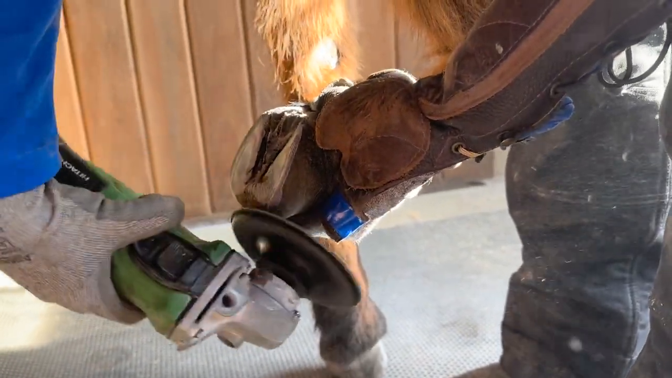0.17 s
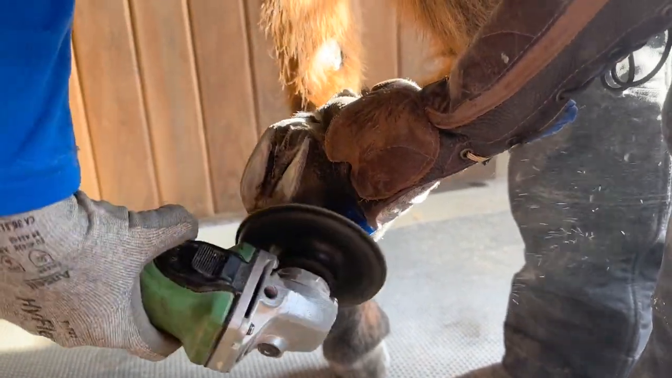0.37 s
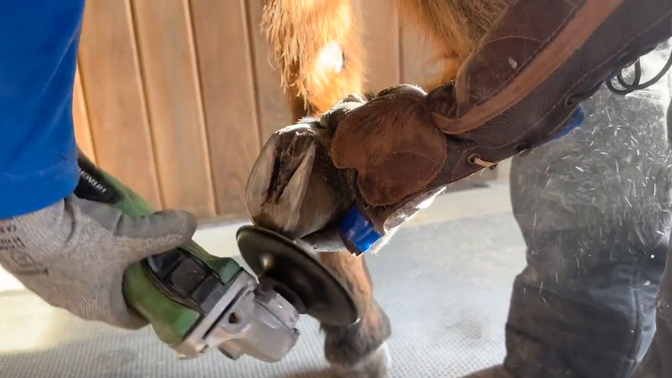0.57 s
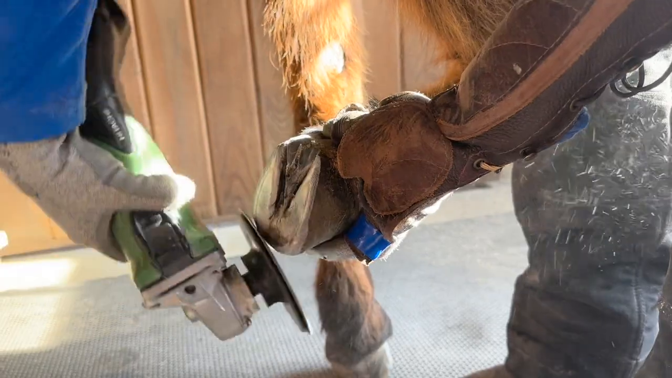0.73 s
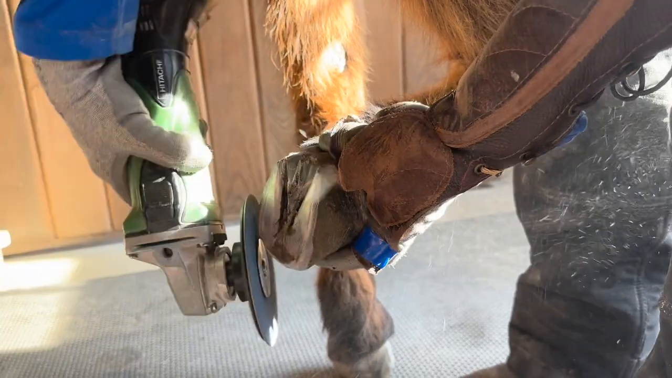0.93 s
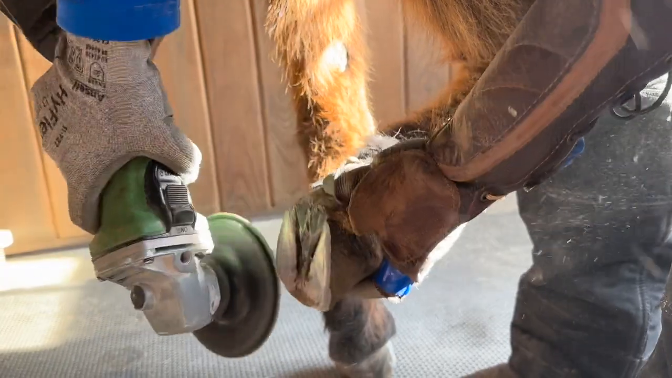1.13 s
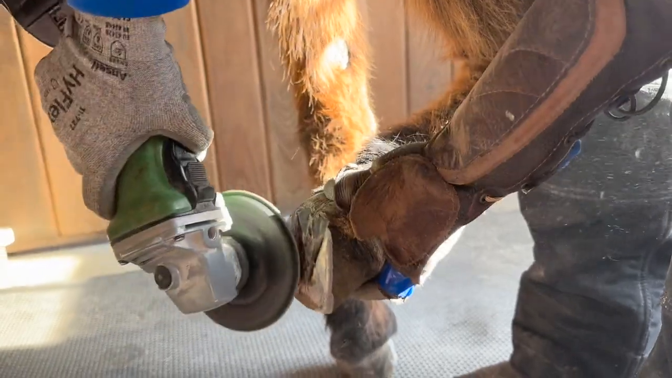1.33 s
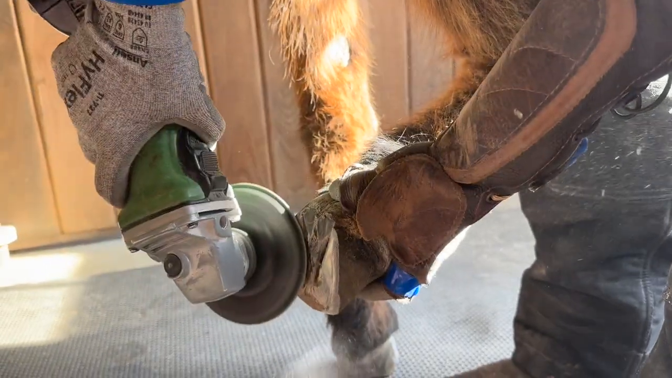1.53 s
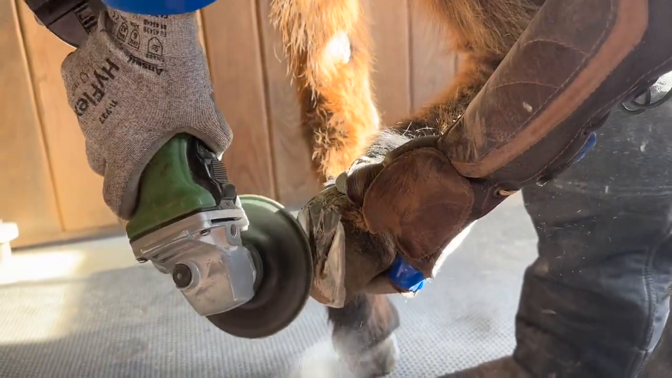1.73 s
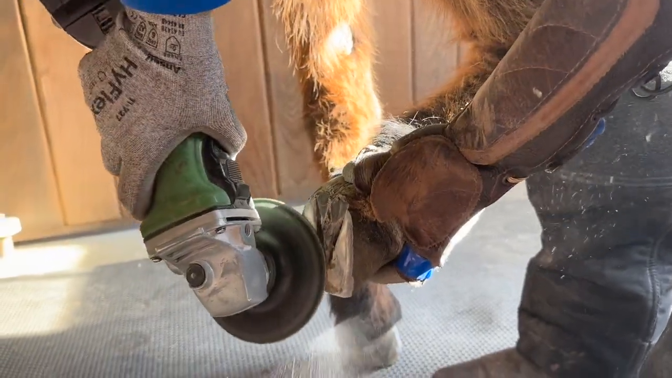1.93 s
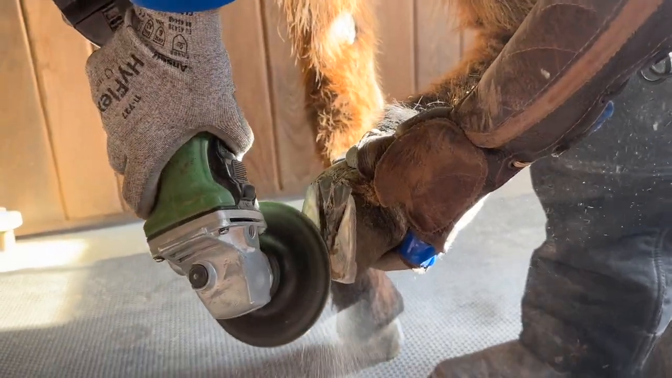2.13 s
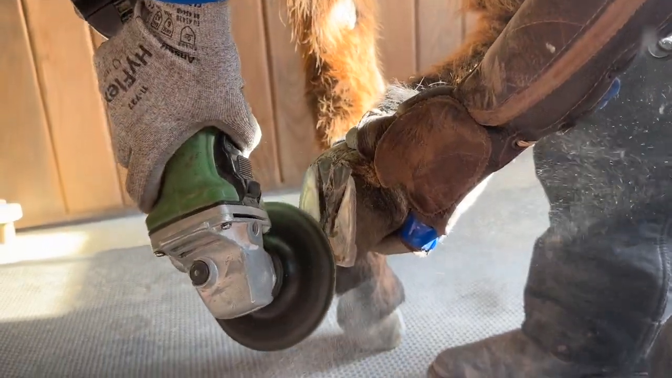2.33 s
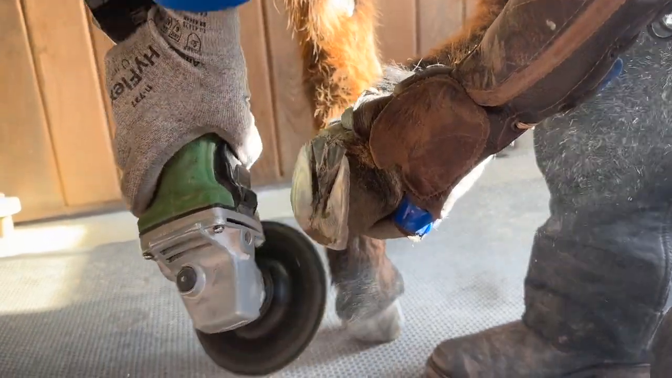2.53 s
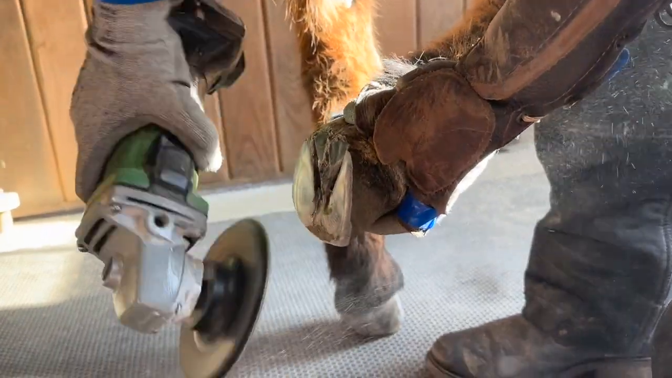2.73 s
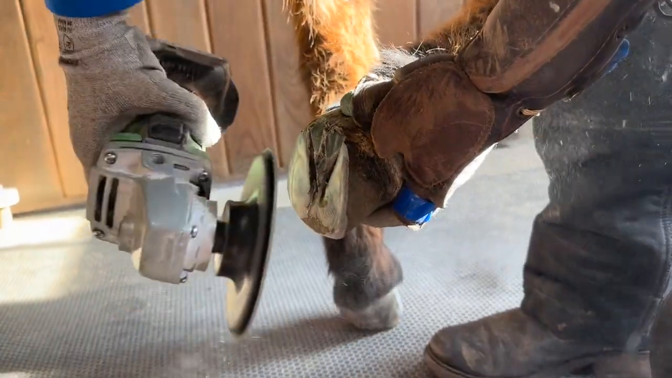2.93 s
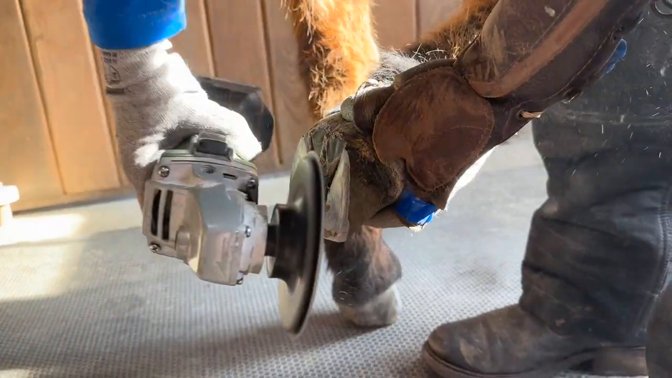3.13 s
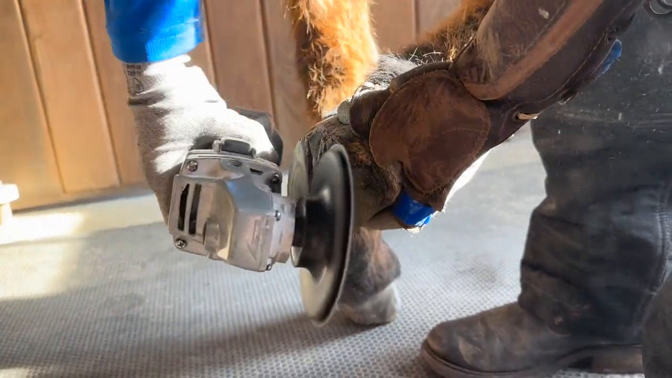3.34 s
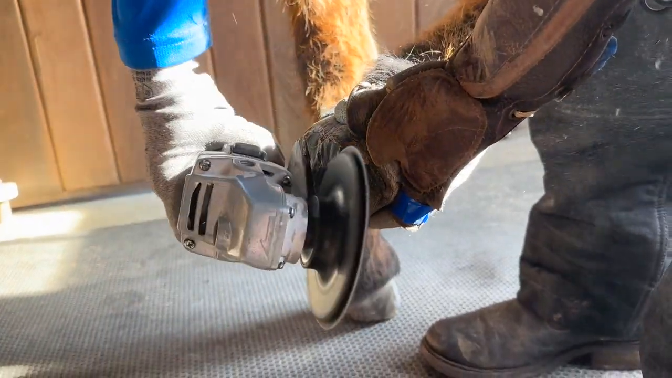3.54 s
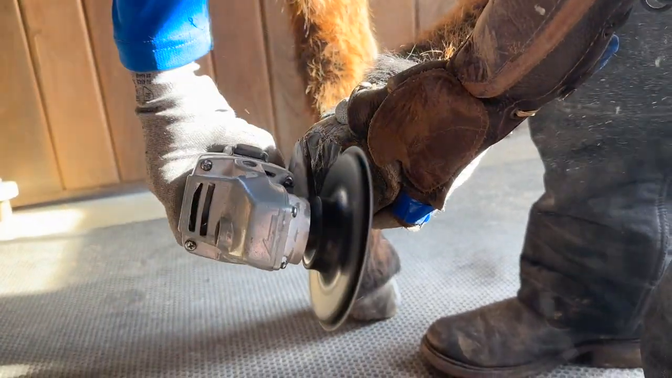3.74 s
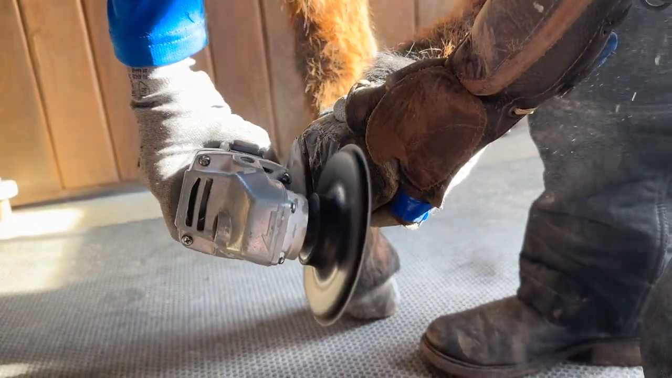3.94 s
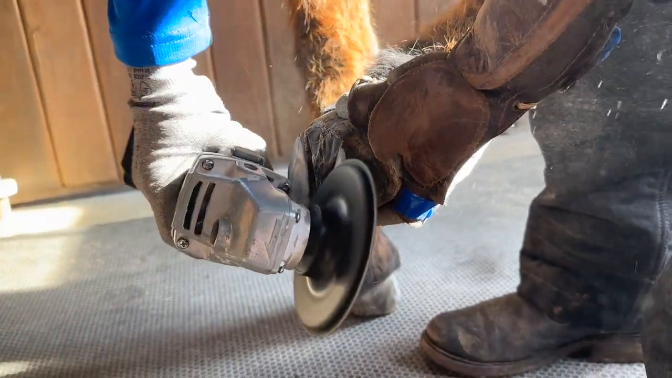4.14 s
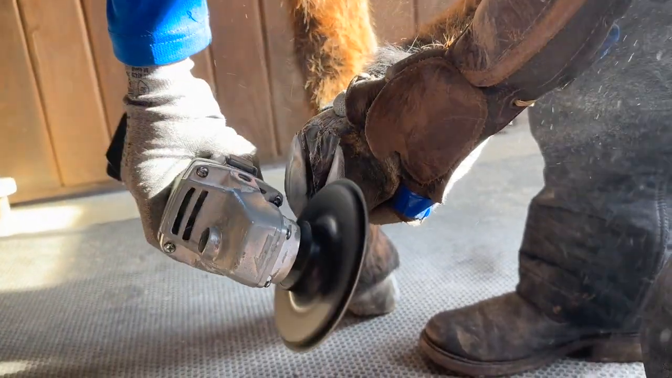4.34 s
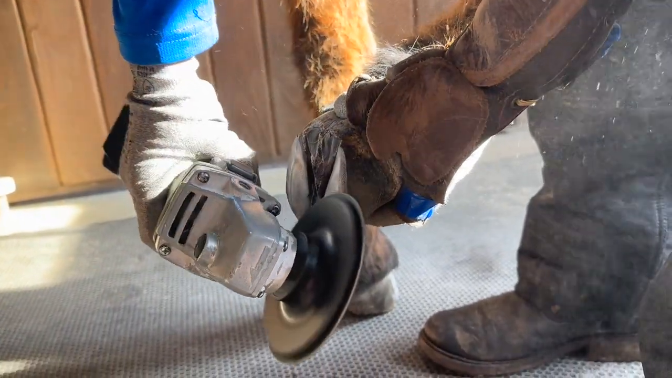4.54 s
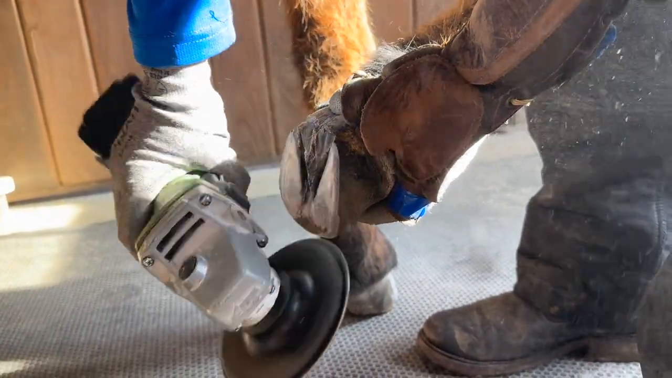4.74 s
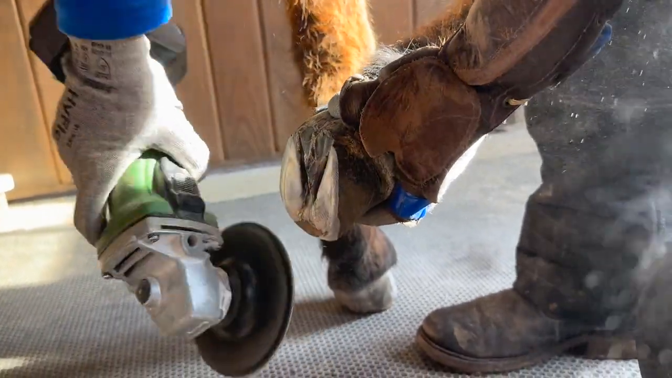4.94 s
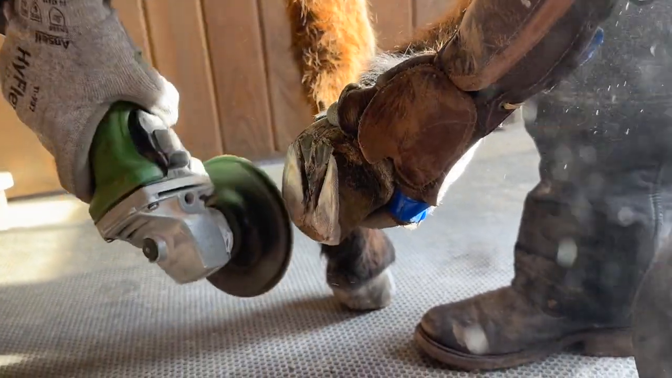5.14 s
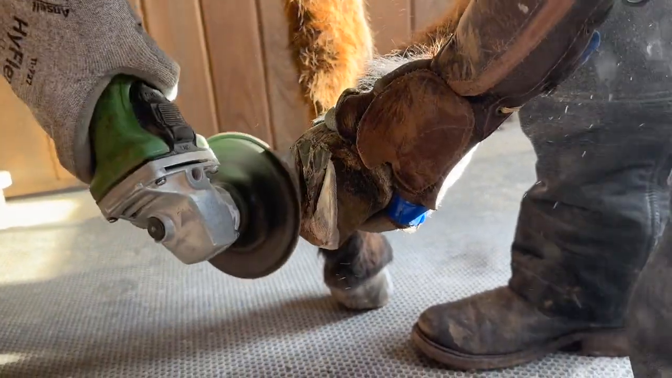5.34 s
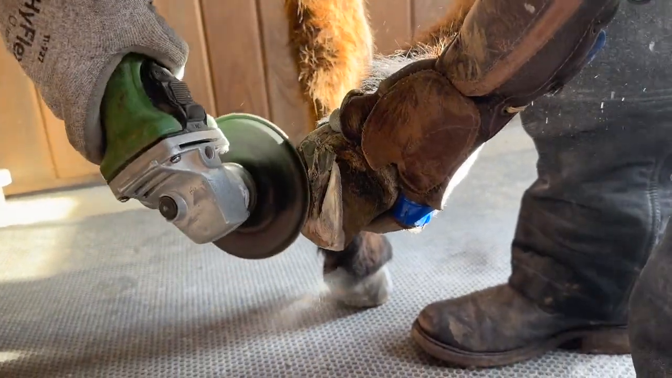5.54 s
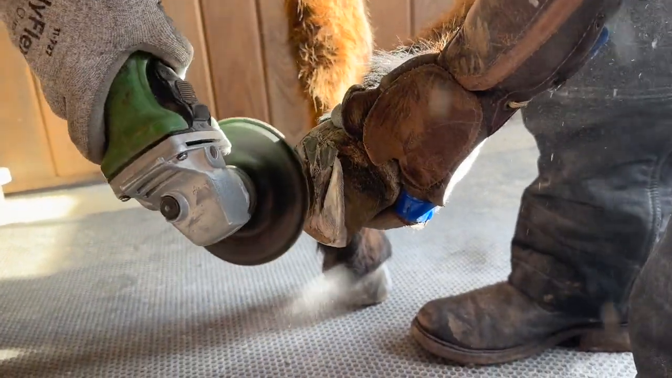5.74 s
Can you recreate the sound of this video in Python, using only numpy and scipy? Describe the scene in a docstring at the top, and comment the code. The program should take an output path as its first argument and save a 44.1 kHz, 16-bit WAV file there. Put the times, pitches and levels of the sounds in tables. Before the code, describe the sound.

An angle grinder rasps a hoof in four passes, buzzing and hissing with squeals, its motor sagging then revving up with gear rattle between.

```python
"""An angle grinder trims a hoof in four passes, heard close up on two microphone ports with no echo.
The grit of the disc scrapes the horn in nearly the same pattern at every turn: a buzzing rasp that sinks
as the motor is loaded, with squeals, slaps and grazes made from sines, chirps and noise.
Between passes the disc spins up, the fan rushes harder and the slack bevel gears rattle;
hum follows the turning rate, fan and gears are shaped noise."""
import sys
import numpy as np
from scipy import signal
from scipy.fft import rfft, irfft, next_fast_len
from scipy.io import wavfile
from scipy.ndimage import uniform_filter1d, map_coordinates

SR = 44100
rng = np.random.default_rng(int(sys.argv[2]) if len(sys.argv) > 2 else 0)


def bounce(signal):
    """Save signal as a 16-bit WAV file at the path given by the first command-line argument."""
    frames = np.transpose(np.atleast_2d(signal))
    limited = np.clip(frames, -1, 1)
    pcm = np.round(limited * 32767).astype(np.int16)
    wavfile.write(sys.argv[1], SR, pcm)


N = 259749

# The motor sags under load and recovers between passes.
# Each row: time in seconds, disc speed in turns per second (a slight wobble is added).
DISC_SPEED = [(0.0, 141.3), (0.11, 140.4), (0.35, 141.8), (0.5, 146.1), (0.59, 146.0), (0.74, 143.4),
              (0.84, 145.5), (0.92, 144.6), (1.02, 146.0), (1.25, 153.4), (1.43, 156.3), (1.56, 150.9),
              (1.68, 143.8), (1.88, 137.2), (2.0, 132.7), (2.3, 130.6), (2.5, 128.0), (2.66, 141.5),
              (2.95, 151.0), (3.42, 155.6), (3.6, 153.5), (3.7, 150.8), (3.79, 152.5), (3.95, 148.6),
              (4.25, 134.6), (4.48, 132.1), (4.69, 132.6), (4.95, 149.0), (5.41, 154.6), (5.54, 150.9),
              (5.62, 148.0), (5.7, 143.6), (5.78, 138.4), (5.87, 134.8)]
FREE_SPEED = 157.8  # turns per second with no load
# Buzz of the hoof. Each row: frequency in Hz, relative density in dB.
HOOF_SPECTRUM = [(200, -20), (400, -8.5), (530, 4), (700, -1), (900, 2), (1200, 5.5), (1450, -1.5),
                 (1750, -2.5)]
# Hiss of the grit. Each row: frequency in Hz, relative density in dB.
HISS_SPECTRUM = [(2500, -1), (3600, -0.5), (4100, -7), (4800, -2.5), (5400, -1.5), (6200, -4.5),
                 (7200, 1.5), (8200, 1), (9500, -0.5), (10500, 2.5), (11500, 2.5), (13000, 1),
                 (15700, -4.5)]
# The disc's ring moves with the contact point, one list for each pass.
# Each row: time in seconds, centre frequency in Hz.
RING_CENTRES = [
    [(0.0, 3150), (0.3, 3050), (0.42, 2770), (0.55, 3100), (0.68, 3240), (0.745, 2600), (0.93, 2670)],
    [(1.4, 2860), (1.68, 2720), (1.79, 2900), (2.0, 2700), (2.3, 2750), (2.51, 2950)],
    [(3.44, 2720), (4.0, 2630), (4.22, 2700), (4.556, 2830), (4.7, 3160)],
    [(5.43, 2900), (5.68, 2900), (5.87, 2730)],
]


def amp(db):
    """Decibels to a linear gain."""
    return 10 ** (np.asarray(db) / 20)


def unit(x):
    """x scaled to rms 1."""
    return x / np.sqrt(np.mean(x ** 2) + 1e-20)


def along(points, hz):
    """Values between points (Hz, value), straight lines on a log frequency axis."""
    f, v = np.transpose(points)
    return np.interp(np.log(hz + 1), np.log(f + 1), v)


def curves(rows):
    """One value per sample for each column after the time."""
    s, *columns = np.transpose(rows)
    return [np.interp(np.arange(N) / SR, s, column) for column in columns]


def wobble(rate, size=N):
    """A smooth random curve with rate knots per second."""
    knots = rng.standard_normal(int(size * rate / SR) + 4)
    return map_coordinates(knots, [np.arange(size) * rate / SR])


def swell(s, length):
    """A smooth bump of height 1 around time s, down to 1/e at length seconds either side."""
    return np.exp(-((np.arange(N) / SR - s) / length) ** 2)


def swells(rows):
    """The summed gain of swells (s, dB, length s)."""
    return sum(amp(db) * swell(s, length) for s, db, length in rows)


def filtered(x, response):
    """x times a complex response of frequency."""
    m = next_fast_len(N + 8192)
    return irfft(rfft(x, m) * response(np.fft.rfftfreq(m, 1 / SR)), m)[..., :N]


def coloured(x, spectrum):
    """x through a spectrum that falls away steeply past its ends, at rms 1."""
    lo, hi = spectrum[0][0], spectrum[-1][0]

    def response(hz):
        low_edge = np.minimum(hz / lo, 1) ** 2
        high_edge = np.maximum(hz / hi, 1) ** 2
        return amp(along(spectrum, hz)) * low_edge / high_edge

    return unit(filtered(x, response))


def noise():
    """Two unrelated white noises."""
    return rng.standard_normal((2, N))


def tone(turns, order):
    """A sine of rms 1 at a multiple of the turning rate."""
    return np.sqrt(2) * np.sin(2 * np.pi * order * turns)


def resonance(x, centre, width_hz, size=1024):
    """x through a steep resonance that follows the rows (s, Hz), at rms 1."""
    hz, t, z = signal.stft(x, SR, nperseg=size)
    centre_hz = np.interp(t, *np.vstack(centre).T)
    detune = (hz[:, None] - centre_hz) / width_hz
    return unit(signal.istft(z / (1 + detune ** 2), SR, nperseg=size)[1][:, :N])


def patchy(x, depth_db, size=512, order=4, count=22):
    """x under random patches of gain, a few hundred Hz wide and about a tenth of a second long."""
    z = signal.stft(x, nperseg=size)[2]
    across_hz = uniform_filter1d(rng.standard_normal(z.shape[1:]), order, 0)
    field = uniform_filter1d(across_hz, count, 1)
    return signal.istft(z * amp(depth_db * unit(field)), nperseg=size)[1][:, :N]


def contact(speed, turns):
    """Gains of buzz, rasp, ring and hiss: strokes set in, grow with load and skip away at lift-off."""
    # The disc on the hoof. Each row: start in seconds, end in seconds, lift-off decay in seconds,
    # then light-load levels in dB of buzz, rasp, ring and hiss, before the hand, tremor and layer trims.
    stroke_rows = [(-.1, 0.905, 0.036, -45.5, -65, -31, -28.5),
                   (1.454, 2.498, 0.033, -35, -41.5, -34, -29.5),
                   (3.426, 3.466, 0.043, -36.5, -30.5, -47, -25.5),
                   (3.521, 3.706, 0.034, -36, -41.5, -33.5, -27.5),
                   (3.728, 3.86, 0.044, -49, -44.5, -41, -40.5),
                   (3.878, 4.683, 0.046, -36.5, -40.5, -34, -29.5),
                   (5.429, 5.864, 0.023, -33, -40, -32.5, -29.5)]
    # Setting in; buzz and rasp need the whole face of the disc.
    # The row: ramp in seconds of buzz, rasp, ring, hiss.
    bed_in = [0.08, 0.15, 0.03, 0.024]
    # Growth with load. The row: dB per turn per second lost, for buzz, rasp, ring, hiss.
    load_gain = [0.028, 0.32, 0.15, 0.22]
    # The hand leans in or eases off. Each row: centre in seconds, change in dB before each layer's
    # share is taken, 1/e half-length in seconds.
    lean_rows = [(0.014, -0.5, 0.04), (0.394, -8, 0.07), (0.753, -6, 0.05), (1.816, 2.5, 0.027),
                 (2.517, 7, 0.031), (3.837, 12, 0.021), (3.928, -10.5, 0.034), (4.67, 6, 0.057),
                 (5.821, 3, 0.029)]
    t = np.arange(N) / SR
    # while it lifts off, the disc skips: the level pulses once a turn
    skip_db = 2.5 * (np.cos(2 * np.pi * turns) - .5)
    strokes = 0
    for start, end, release, *levels in stroke_rows:
        lift = np.maximum(t - end, 0) / release
        lift_off = np.exp(-lift) * amp(np.minimum(lift, 1) * skip_db)
        set_in = np.clip((t - start) / np.vstack(bed_in), 0, 1)
        strokes = strokes + amp(levels)[:, None] * set_in * lift_off
    load_db = np.outer(load_gain, FREE_SPEED - speed)
    hand_db = sum(db * swell(s, length) for s, db, length in lean_rows)
    follows_hand = [0.91, 0.077, 0.29, 0.84]  # share taken by buzz, rasp, ring, hiss
    # the contact is never quite steady
    tremor_db = 1.17 * np.array([wobble(21.983) for _ in follows_hand])
    return strokes * amp(load_db + np.outer(follows_hand, hand_db) + tremor_db)


def grit(turns, wear, uneven_db, rough, size=2048, count=128, order=76):
    """Two scrape patterns repeat each turn and wear into new ones; rough is the share never repeating."""
    shape = (2, count, order)
    first_phase = rng.uniform(0, 2 * np.pi, (2, 1, order))
    drift = first_phase + np.cumsum(rng.normal(0, 0.478, shape), axis=1)
    rims = irfft(amp(uneven_db * rng.standard_normal(shape)) * np.exp(1j * drift), size)
    # read across the worn patterns (wear per second) and round the rim
    where = [np.arange(N) / SR * wear, turns % 1 * size]
    scrapes = [map_coordinates(rim, where, order=1, mode="grid-wrap") for rim in rims]
    repeating = unit(np.array(scrapes))
    share = np.clip(rough, 0, 1)
    return np.sqrt(1 - share) * repeating + np.sqrt(share) * noise()


def loaded(light_hz, rise_hz):
    """Rows (s, Hz) of a resonance that stiffens as the disc is pressed on."""
    return [(s, light_hz + rise_hz * (FREE_SPEED - speed)) for s, speed in DISC_SPEED]


def grinding(turns, gains):
    """The grit shakes hoof and disc; the high side of the disc bites harder once a turn."""
    # Rasp of the horn. Each row: frequency in Hz, relative density in dB.
    horn_spectrum = [(1200, -12), (1500, -0.5), (1850, 2.5), (2050, 9.5), (2250, -4.5), (2600, -0.5)]
    # Broad ring of the disc. Each row: frequency in Hz, relative density in dB.
    disc_spectrum = [(2050, -27), (2250, -36), (2420, 1.5), (2700, 6), (3200, -1), (3600, -6), (4200, 5)]
    # The hoof wall growls when the disc lies flat on it.
    # Each row: centre in seconds, level in dB, 1/e half-length in seconds.
    growl_rows = [(1.83, -33, 0.08), (2.2, -31.5, 0.24), (5.61, -39, 0.038)]
    # The brightest part of the hiss moves with the tilt of the disc.
    # Each row: time in seconds, centre frequency in Hz.
    sizzle_centres = [(0.0, 8700), (0.9, 8800), (1.6, 8850), (2.5, 8950), (3.45, 8500), (4.2, 7440),
                      (4.7, 7860), (5.87, 8000)]
    buzz, rasp, ring, hiss = gains
    bite = np.cos(2 * np.pi * turns) + 0.3 * np.cos(2 * 2 * np.pi * turns + wobble(1.76))

    push = patchy(grit(turns, wear=11, uneven_db=2.5, rough=0.15), depth_db=1.0)
    crumble = grit(turns, wear=11, uneven_db=2, rough=.2)
    # the wall resonates at 900 Hz under no load, 20.7 Hz higher per turn per second lost
    wall = resonance(crumble, loaded(900, 20.7), width_hz=356)
    wall_gain = amp(-14.5) * buzz + swells(growl_rows)
    hoof = amp(-2.5) * buzz * coloured(push, HOOF_SPECTRUM) + wall_gain * wall

    scrape = grit(turns, wear=11, uneven_db=2.5, rough=.11)
    horn = amp(1.0) * rasp * coloured(scrape, horn_spectrum)

    # the disc's broad resonance favours now one, now another order of the turning rate
    rim = grit(turns, wear=21, uneven_db=2.5, rough=.19)
    shake = coloured(rim * amp(0.5 * bite), disc_spectrum)
    skirt = patchy(resonance(shake, RING_CENTRES, width_hz=680), depth_db=1.6)
    disc = amp(-1.5) * ring * skirt

    # the wandering contact point favours now some, now others of the disc's high modes
    flutter = unit(amp(1.43 * bite + 1.14 * wobble(400) + 0.64 * wobble(35)))
    grains = flutter * patchy(grit(turns, wear=21, uneven_db=3.5, rough=0.52), depth_db=2.1)
    broad = amp(1.0) * coloured(grains, HISS_SPECTRUM)
    sizzle = amp(-13.5) * resonance(grains, sizzle_centres, width_hz=1000)
    return hoof + horn + disc + hiss * (broad + sizzle)


def motor(speed, turns):
    """Unbalance hums at the turning rate, the housing drones above it, the fan rushes through the vents."""
    # Unbalance of the disc. Each row: time in seconds, level in dB about which the hum wavers.
    hum_rows = [(0.0, -68), (0.97, -76), (1.05, -55.5), (1.85, -54.5), (1.95, -72), (2.77, -53.5),
                (4.02, -54.5), (4.28, -67), (4.62, -62), (4.67, -52), (4.72, -61), (5.02, -50), (5.33, -56),
                (5.63, -52.5), (5.89, -61)]
    # The housing at three times the turning rate.
    # Each row: time in seconds, level in dB about which the drone wavers.
    drone_rows = [(1.2, -61), (1.48, -47), (1.8, -55), (2.65, -54), (3.0, -67), (4.9, -63), (5.3, -50)]
    # Rush of the fan. Each row: frequency in Hz, relative density in dB.
    fan_spectrum = [(30, -24), (100, -13), (180, -11), (300, -5), (450, -0.5), (900, 1), (1300, -0.5),
                    (1650, -1), (2000, -4.5), (2800, -2.5), (3600, -2.5), (5700, -2.5), (7500, -4),
                    (10000, -5), (15500, -8)]
    # The air vents howl when they face the microphone.
    # Each row: time in seconds, level in dB, centre frequency in Hz.
    vent_rows = [(0.0, -44, 1550), (.85, -47.5, 1520), (1.2, -52, 1660), (2.6, -43, 1630),
                 (3.35, -44.5, 1640), (4.8, -51.5, 1640), (5.89, -46, 1680)]
    hum = amp(curves(hum_rows)[0] + wobble(12)) * tone(turns, order=1)
    drone = amp(curves(drone_rows)[0] + 2.9 * wobble(9)) * tone(turns, order=3)
    air_gain = amp(-36.5 + 1.3 * wobble(6.9)) * speed / np.mean(speed)
    air = air_gain * coloured(noise(), fan_spectrum)
    vent_centres = [(s, hz) for s, db, hz in vent_rows]
    howl = amp(curves(vent_rows)[0]) * resonance(noise(), vent_centres, width_hz=190)
    return air + howl + (hum + drone) * np.array([[1], [0]])


def gears(load, count=900):
    """Slack teeth knock about every second turn and ring the gear head; load presses them together."""
    # The hardest knocks. Each row: time in seconds, level in dB over an ordinary knock.
    knock_rows = [(1.0716, 2), (1.2203, 5.5), (2.7714, 3.5), (3.2792, 5), (5.0537, 2), (5.0816, 3),
                  (5.3285, 3.5)]
    # Rattle of the teeth. Each row: frequency in Hz, relative density in dB.
    gear_spectrum = [(2500, -9.5), (4000, -6.5), (4700, -1.5), (5250, 1.5), (5700, -0.5), (6050, 1),
                     (7500, -8), (10000, -1), (13000, -8), (15500, -9)]
    # The narrow whirr of the gear head drifts with speed and with the way the tool is held.
    # Each row: time in seconds, centre frequency in Hz, level in dB before the knocks add to it.
    whirr_rows = [(0.0, 5830, -63), (0.95, 5740, -48), (1.2, 5870, -43.5), (1.7, 5700, -34.5),
                  (2.35, 5300, -37), (2.65, 5400, -39.5), (2.8, 6030, -42), (3.25, 5900, -53),
                  (3.6, 5430, -47), (4.75, 5600, -48), (4.9, 5750, -37), (5.3, 5560, -41.5),
                  (5.87, 5500, -31)]
    gap, size = rng.standard_normal((2, count))
    times = np.cumsum(.0132 * np.exp(.11 * gap))  # seconds
    ordinary = np.transpose([times, 1.5 * size])
    s, db = np.vstack([ordinary, knock_rows]).T
    knocks = np.bincount((s * SR).astype(int), amp(db) ** 2, N)[:N]
    t = np.arange(SR // 40) / SR
    burst = (1 - np.exp(-t / .0003)) ** 2 * np.exp(-(t / .002) ** 2)
    # knocks add up in power
    envelope = np.sqrt(np.abs(signal.fftconvolve(knocks, burst)[:N]))
    slack = 1 / (1 + load / amp(-23.0))
    rattle = amp(-36.0) * slack * coloured(envelope * noise(), gear_spectrum)
    whirr_centres = [(s, hz) for s, hz, db in whirr_rows]
    shaken = (1 + slack * unit(envelope)) * noise()
    whirr = amp(curves(whirr_rows)[1]) * resonance(shaken, whirr_centres, width_hz=240)
    return rattle + whirr


def squeals(speed, turns, waver_db=2.5, slip=0.41, bite_db=2.0):
    """A resonance of disc or hoof locks on to the nearest multiple of the turning rate and sings."""
    # Each row: centre in seconds, level in dB before flutter and pulsing,
    # 1/e half-length in seconds, resonance in Hz.
    squeal_rows = [(0.14, -27, 0.06, 2950), (0.06, -33, 0.092, 3100), (0.23, -35.5, 0.14, 3250),
                   (0.29, -37, 0.09, 3300), (0.27, -30.5, .09, 2690), (0.286, -35, 0.077, 2400),
                   (0.511, -17.5, 0.0487, 2770), (0.62, -28, 0.065, 2700), (0.67, -29, 0.069, 3610),
                   (0.8, -31.5, 0.076, 2440), (0.864, -26.5, 0.054, 2600), (.86, -33, 0.065, 2900),
                   (.86, -47.5, .13, 575), (1.63, -30.5, 0.091, 880), (1.671, -24.5, 0.0565, 2600),
                   (1.726, -35, 0.057, 2000), (1.932, -33.5, 0.12, 950), (1.98, -30, 0.078, 2010),
                   (2.22, -32.5, 0.28, 1180), (2.206, -28.5, 0.17, 1840), (2.32, -33, 0.12, 2740),
                   (1.87, -36, .07, 1630), (.11, -36, .04, 3510), (2.385, -24.5, 0.074, 2070),
                   (2.37, -24.5, 0.097, 3110), (2.457, -24.5, 0.032, 3500), (2.33, -32.5, 0.17, 9300),
                   (3.42, -44, 0.12, 2800), (3.584, -30, 0.058, 2770), (3.682, -31, 0.034, 2560),
                   (3.625, -37.5, 0.068, 1830), (4.02, -30, .04, 2610), (4.28, -22.5, 0.0345, 2690),
                   (4.493, -27.5, 0.063, 2780), (4.49, -33.5, 0.15, 1990), (4.545, -32, 0.079, 2120),
                   (4.5, -32, .1, 2385), (4.57, -31, 0.05, 4900), (4.57, -33, .09, 6000),
                   (4.575, -35, 0.078, 8200), (4.667, -31, 0.031, 3180), (5.624, -31, 0.056, 890),
                   (5.698, -23, 0.03, 2580), (5.832, -30.5, 0.048, 2730), (5.821, -35.5, 0.059, 545)]
    out, t = np.zeros(N), np.arange(N) / SR
    for s, db, length, hz in squeal_rows:
        near = np.abs(t - s) < 3 * length
        order = np.round(hz / speed[int(s * SR)])
        flutter, wander = wobble(91.6, size=near.sum()), wobble(69.8, size=near.sum())
        # a pulse once a turn, the deeper the higher the resonance lies
        pulse_db = bite_db * hz / 3000 * np.cos(2 * np.pi * turns[near])
        bump = np.exp(-((t[near] - s) / length) ** 2)
        gain = amp(db + waver_db * flutter + pulse_db) * bump
        slipping = slip * wander / (2 * np.pi * order)  # turns
        out[near] += gain * tone(turns[near] + slipping, order)
    return out * np.array([[1], [0]])


def chatter(speed, turns, scatter=0.4, uneven_db=2.0):
    """The high side of the rim slaps the horn once a turn, each slap a short, slightly varied falling chirp."""
    # Each row: centre in seconds, level in dB, 1/e half-length in seconds,
    # chirp frequency in Hz at the middle of a slap.
    chatter_rows = [(.11, -26.5, .06, 3080), (0.24, -23.5, 0.041, 2960), (.6, -26, .075, 3040),
                    (4.296, -34, .04, 2660), (4.566, -28, .04, 2550), (5.587, -34, 0.11, 1020),
                    (5.84, -31, .03, 2700)]
    slap_s, fall_hz_per_s = 0.0017, 110000
    turn = np.round(turns).astype(int)
    t = (turns - turn) / speed  # seconds from the nearest slap
    out = 0
    for s, db, length, hz in chatter_rows:
        phase, size = rng.standard_normal((2, turn[-1] + 1))[:, turn]
        chirp = np.sin(2 * np.pi * (hz - fall_hz_per_s * t / 2) * t + scatter * phase)
        slaps = unit(amp(uneven_db * size) * np.exp(-(t / slap_s) ** 2) * chirp)
        out = out + amp(db) * swell(s, length) * slaps
    return out * np.array([[1], [0]])


def touches():
    """The rim grazes the horn: hard catches hiss and thud, light ones only ring the disc."""
    # A light touch rings the disc in a hoarse burst.
    # Each row: centre in seconds, level in dB, 1/e half-length in seconds.
    skim_rows = [(.2, -32, 0.11), (.86, -39, 0.053), (1.404, -27.5, .009), (1.82, -36, 0.055),
                 (3.425, -33, 0.011), (3.475, -31, 0.021), (3.63, -35, 0.082), (3.84, -28.5, 0.022),
                 (3.895, -38, 0.014), (3.965, -29, 0.015), (4.03, -30.5, 0.048)]
    # The rim catches the horn abruptly.
    # Each row: centre in seconds, level in dB before the trims of hiss and thud, 1/e half-length in seconds.
    catch_rows = [(1.404, -28, 0.0085), (1.441, -32, 0.013), (2.488, -24, 0.0016), (3.91, -31.5, 0.025),
                  (5.431, -24.5, 0.0095)]
    hiss = amp(6.0) * coloured(noise(), HISS_SPECTRUM)
    thud = amp(-5.5) * coloured(noise(), HOOF_SPECTRUM)
    skims = swells(skim_rows) * resonance(noise(), RING_CENTRES, width_hz=150)
    return swells(catch_rows) * (hiss + thud) + skims


def draught():
    """Air flung off the disc puffs on the microphone as low-pitched noise."""
    # Each row: centre in seconds, level in dB before a common trim, 1/e half-length in seconds.
    puff_rows = [(2.485, -57, 0.073), (3.54, -59, 0.077), (4.542, -61, 0.086), (4.686, -48, 0.027),
                 (1.81, -64, .027), (5.88, -57, 0.028)]
    puff_spectrum = [(25, -19), (50, 0), (100, -1.0), (250, -8.0), (450, -13)]  # Hz, relative dB
    return amp(6.0) * swells(puff_rows) * coloured(noise(), puff_spectrum)


def ports(pair):
    """The first signal reaches both ports alike, the second is the room's diffuse share."""
    # Each row: frequency in Hz, likeness of the two ports (held within 0 to 0.995 after interpolation).
    likeness = [(100, 0.86), (500, 0.9), (1200, 0.56), (2000, 0.25), (2900, 0.3), (4100, 0.12), (5500, 0.6),
                (7500, 0), (8600, 1), (10200, 0.7), (11300, 1.94), (12900, 1.5), (14300, 5.2)]
    # Each row: frequency in Hz, phase in radians by which left leads right.
    left_lead = [(200, .05), (1000, .55), (2000, 1.1), (3500, 2), (4800, .4), (6200, .8), (7500, 1.5),
                 (8200, .1), (9500, -1.45), (11300, -3.14), (12700, -4.6), (14000, -6.28)]
    # Each row: frequency in Hz, level of left over right in dB.
    left_over_right = [(100, 0.4), (700, 1.5), (1800, -1.5), (2700, 2.5), (4500, -0.5), (5700, 4.5),
                       (6700, 3.5), (7600, 6), (9200, -1), (16000, 0)]

    def shares(hz):
        angle = np.arccos(np.clip(along(likeness, hz), 0, .995)) / 2
        return np.array([np.cos(angle), np.sin(angle)])

    half = np.array([[.5], [-.5]])

    def offset(hz):
        gain = amp(half * along(left_over_right, hz))
        return gain * np.exp(1j * half * along(left_lead, hz))

    mid, side = filtered(pair, shares)
    return filtered(np.array([mid + side, mid - side]), offset)


def scene():
    """The speed of the disc ties the grinder's layers together; all reach the two microphone ports."""
    speed = curves(DISC_SPEED)[0]
    turns = np.cumsum(speed + 0.15 * wobble(25)) / SR
    gains = contact(speed, turns)
    pair = grinding(turns, gains) + motor(speed, turns)
    pair = pair + gears(gains[-1])  # the hiss gain stands for the load on the teeth
    pair = pair + squeals(speed, turns) + chatter(speed, turns)
    pair = pair + touches() + draught()
    return ports(pair)


def record(dry):
    """The camera's microphones keep nothing from 15.9 kHz upwards."""
    return filtered(dry, lambda hz: hz < 15900)


dry = scene()
out = record(dry)
bounce(out)
```